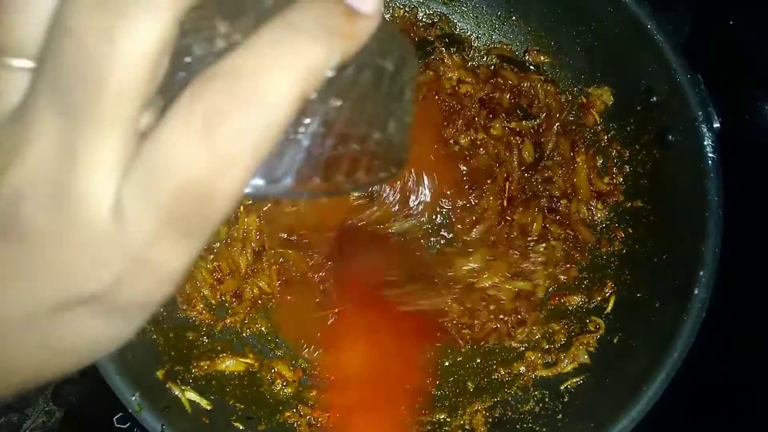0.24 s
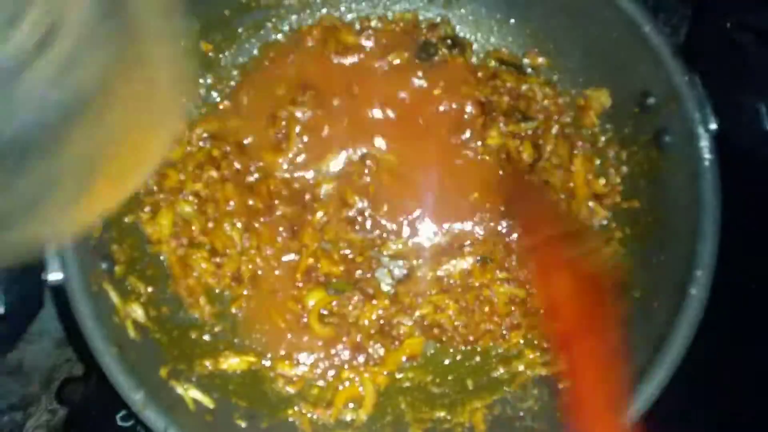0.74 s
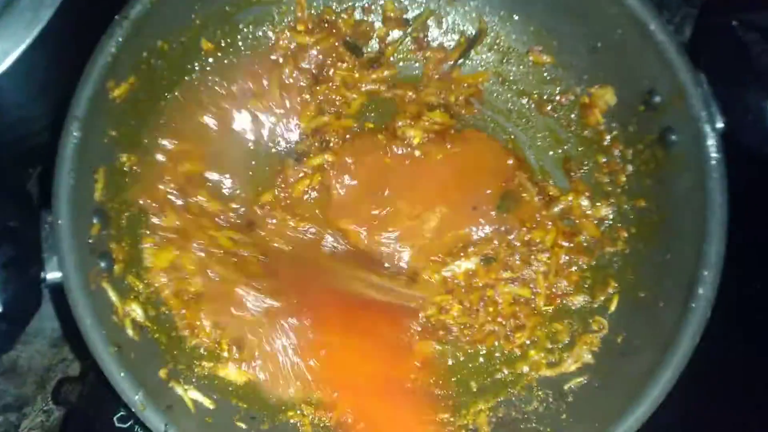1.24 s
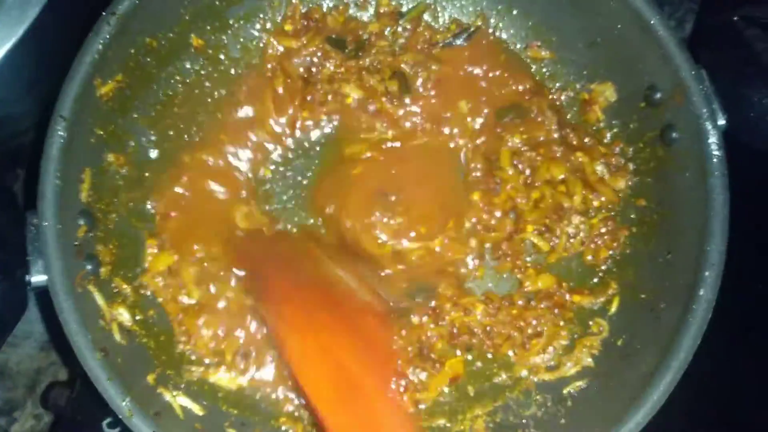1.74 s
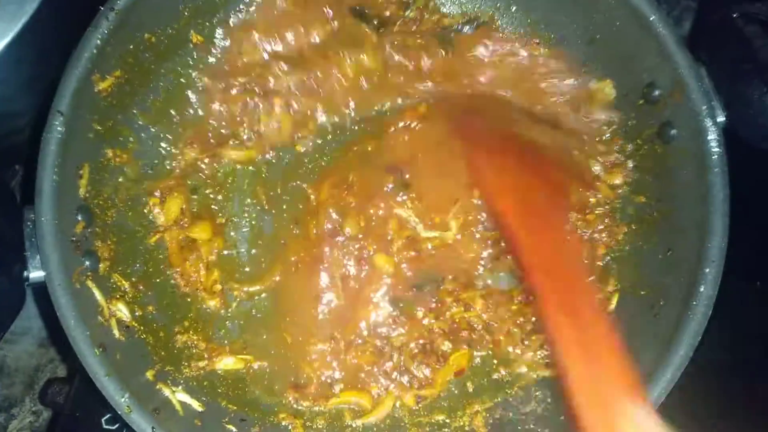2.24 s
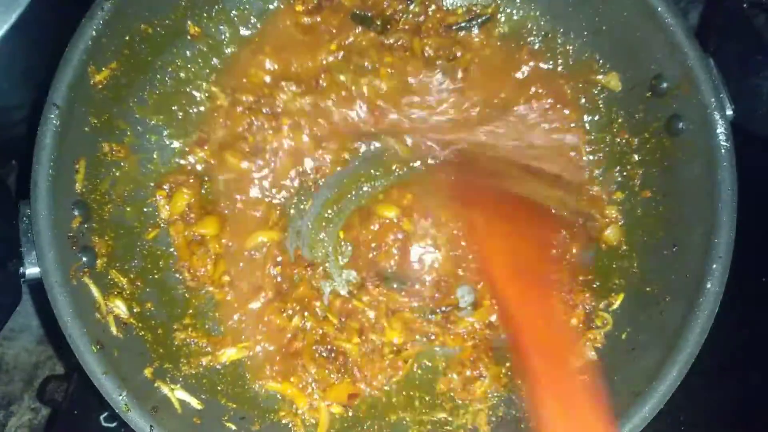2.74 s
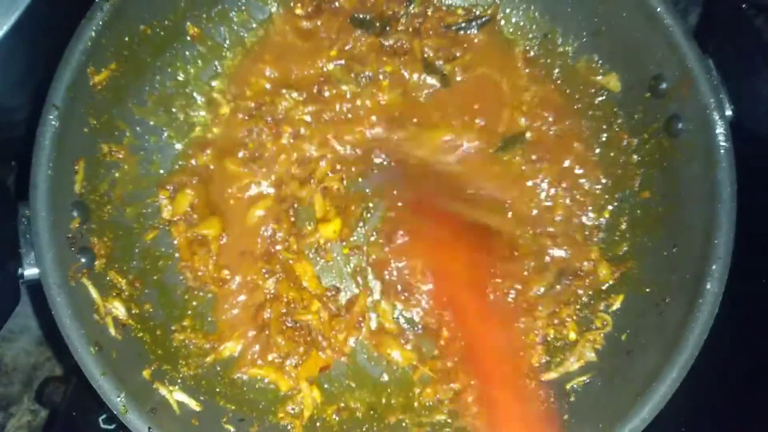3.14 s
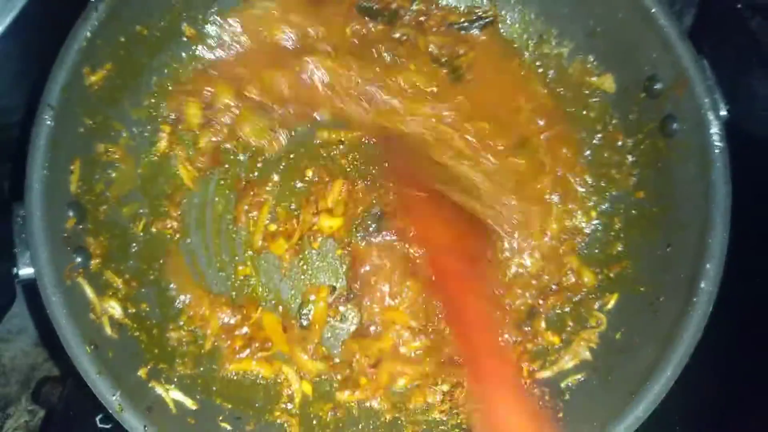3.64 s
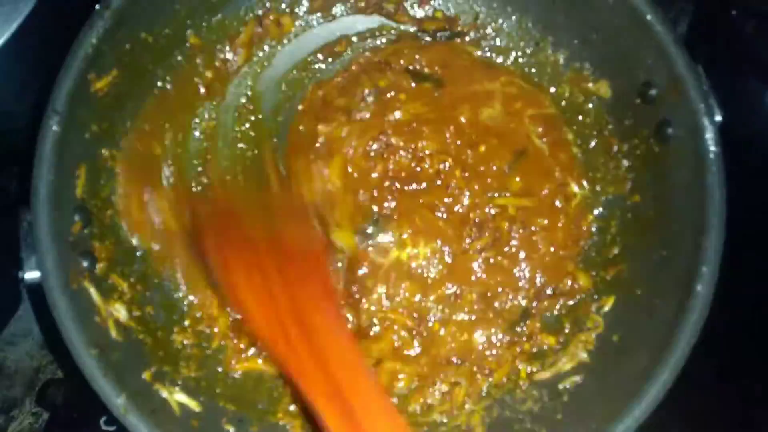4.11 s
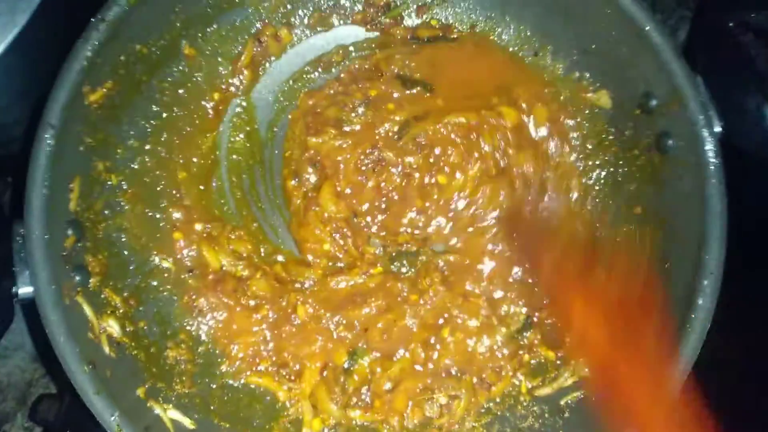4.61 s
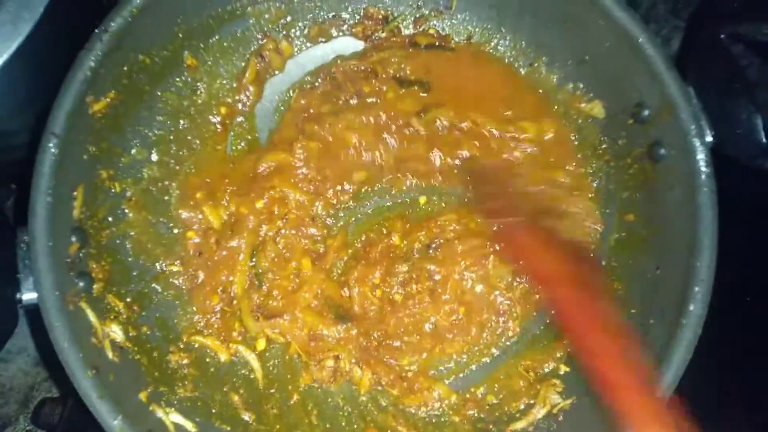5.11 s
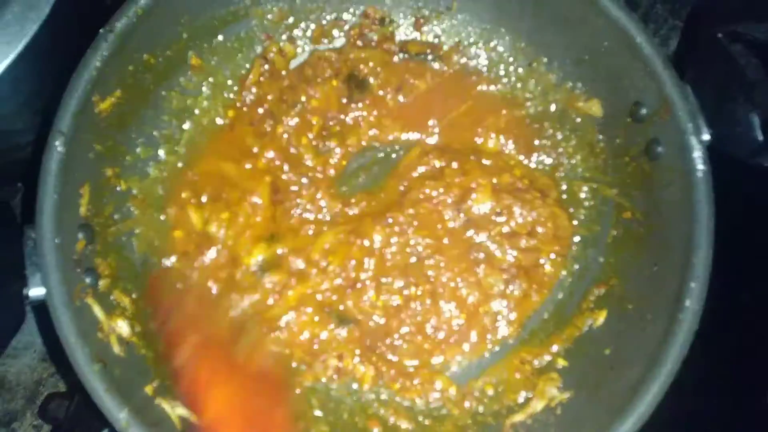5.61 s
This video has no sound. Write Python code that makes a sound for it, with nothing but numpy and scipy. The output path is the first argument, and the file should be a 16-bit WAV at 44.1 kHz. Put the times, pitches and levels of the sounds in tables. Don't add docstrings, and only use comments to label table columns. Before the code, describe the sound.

For nearly six seconds, wet onion masala sizzles in hot oil in a metal pan: bright steam hiss filled with fine crackles and bursting bubbles, fluttering constantly and somewhat stronger on the right. It surges around 0.3, 1.4 and 2.5 s, quietens to its lowest near 4 s, swells again at 4.8 s, then slowly eases. A wooden spatula gives a clear knock at 0.75 s with short pan ring, a gritty scrape cluster with light knocks at 2.5-2.7 s, more scraping at 3.4-3.6 s, and a dull knock at 3.8 s. Softer taps and scrapes follow at 4.5-4.7 s, the loudest, brighter blow at 5.2 s, and a dull knock with rubbing near 5.7 s. Beneath lie low gas-flame and traffic rumble, swelling slightly at 3.2 and 5.3 s, and a faint distant engine whine rising around 3.2-4.1 s. The small kitchen adds brief reflections; everything is close.

```python
import sys
import numpy as np
from scipy import signal
from scipy.fft import rfft, irfft, next_fast_len
from scipy.io import wavfile
from scipy.ndimage import uniform_filter1d, map_coordinates

SR = 44100
rng = np.random.default_rng(int(sys.argv[2]) if len(sys.argv) > 2 else 0)


def unload_audio(sound):
    columns = np.transpose(np.atleast_2d(sound))
    steps = np.round(np.clip(columns, -1, 1) * 32767)
    wavfile.write(sys.argv[1], SR, steps.astype(np.int16))


def voltage_ratio(level):
    return 10 ** (np.asarray(level, float) / 20)


N = 258406

# frequency in Hz, density in dB per Hz.
RUMBLE_SPECTRUM = [(12, -64), (20, -36), (38, -45), (59, -4.5), (81, -2.5), (108, 0.5), (220, -22.5),
                   (290, -44), (480, -120)]
# frequency in Hz, density in dB per Hz.
FLAME_SPECTRUM = [(94, -36), (160, -33.5), (300, -15), (350, -3), (428, -21.5), (615, -7), (771, -15),
                  (843, -2.5), (1100, -13), (1430, -27), (2420, -120)]
# middle in seconds, half length in seconds, swell in dB.
TRUCKS = [
    (3.205, 0.083, 6),
    (5.283, 0.11, 12),
]
# time in seconds, frequency in Hz.
ENGINE_PITCH = [(0, 337), (3.0, 335), (3.28, 369), (3.55, 376), (3.75, 392), (3.9, 428), (4.04, 452),
                (4.2, 446)]
# middle in seconds, half length in seconds, level in dB.
ENGINE_REVS = [(.05, .06, -59), (3.18, 0.12, -59), (3.626, 0.07, -66.5), (3.966, 0.047, -49.5),
               (4.077, 0.04, -56.5)]
# frequency in Hz, t60 in seconds.
KITCHEN_DECAY = [(150, 0.31), (500, 0.2), (1500, 0.19), (4000, 0.036)]
# frequency in Hz, left lead in radians.
PAN_LEAD = [(60, 2.5), (800, -1.5), (1000, 0.5), (1150, 4.5), (1500, 0.5), (1850, 0), (2500, -4)]
# frequency in Hz, left-right in dB.
PAN_SIDE = [(60, 2), (110, -11.5), (200, 4), (380, -2.5), (700, -4.5), (1290, 7), (2380, 1), (4400, 8),
            (8120, 4), (15000, -2.5)]
# frequency in Hz, width in Hz, level in dB.
PAN_BODY = [(257, 32, -4.5), (337.5, 57, -2), (490, 170, 0)]
# frequency in Hz, width in Hz, level in dB.
PAN_FLOOR = [(643, 130, 0), (846, 150, -1), (948, 170, -0.5), (1195, 290, 1.5)]
# frequency in Hz, width in Hz, level in dB.
BLADE = [(1604, 360, -3), (1782, 170, -3.5), (2250, 330, 2), (2830, 1000, 1)]
# start in seconds, length in seconds, peak in dB, pitch from in Hz, pitch to in Hz.
SCRAPES = [(0.388, 0.12, -37, 810, 960), (0.448, 0.092, -46.5, 1020, 1880), (1.329, 0.076, -42, 2210, 2250),
           (1.46, 0.22, -59, 940, 990), (2.523, 0.056, -53.5, 246, 340), (2.564, 0.056, -31.5, 900, 1030),
           (2.593, 0.055, -28, 1590, 1990), (2.599, 0.081, -48, 1100, 1270), (3.411, 0.13, -37, 870, 1000),
           (3.485, 0.092, -36.5, 1046, 826), (3.459, 0.13, -35.5, 1200, 1930),
           (3.49, 0.078, -29.5, 2310, 3300), (4.161, 0.034, -48, 970, 1010), (4.525, 0.045, -51, 258, 242),
           (4.558, 0.13, -37.5, 2160, 2250), (4.661, 0.084, -34, 1820, 1470), (4.912, 0.073, -41, 810, 960),
           (5.597, 0.055, -48, 356, 241), (5.675, 0.085, -42, 324, 414), (5.669, 0.15, -38, 774, 1100),
           (5.723, 0.091, -44.5, 566, 650), (5.736, .1, -43, 1210, 2100)]
# frequency in Hz, level in dB, t60 in seconds.
PAN_MODES = [(165.3, -16, 0.52), (246.4, -5, 0.27), (430, -7, 0.31), (511, -8.5, 0.51), (596, -15, 0.15),
             (930, -12, 0.12), (1028, -6, 0.19), (1210, 6, 0.24), (1370, -21, 0.31), (1517, -5, 0.11),
             (1690, -28, .15)]
# start in seconds, peak in dB, contact tone in Hz, low ring in dB, high ring in dB.
KNOCKS = [(0.425, -45, 900, -19, -8), (0.745, -16, 950, -15.5, -6.5), (1.073, -40, 1830, -21, -9),
          (2.526, -45, 226, -7.5, -12), (2.585, -34, 980, -29, -19), (2.602, -32, 1090, -33, -5),
          (3.791, -17.5, 937, -16, -22), (4.514, -27, 940, -10, -8), (4.675, -27, 1384, -19, -3),
          (5.183, -12, 1100, -16.5, -4), (5.608, -47, 326, -2.5, -19), (5.666, -24.5, 923, -16, -26)]
# frequency in Hz, density in dB per Hz.
STEAM_SPECTRUM = [(260, -41.5), (450, -8.5), (523, -29), (616, -17), (771, -17.5), (843, -12),
                  (1170, -19.5), (2260, -10.5), (2550, -14.5), (4230, -10.5), (6060, -9.5), (7930, 0.5),
                  (10800, -6.5), (15100, -12.5), (16000, -16)]
# frequency in Hz, left-right in dB.
PORT_COLOUR = [(60, 10), (99, 0.0), (160, -5), (270, 14.5), (450, -5.5), (740, -4), (1220, 0), (2010, 3),
               (3330, 0.5), (5500, -8.5), (9080, -4.5), (15000, 6.5)]
# centre in Hz, gain in dB.
CROWDS = [
    (2000, 57),
    (4000, 50.5),
    (7500, 41.5),
    (12000, 48.5),
]
# time in seconds, boil in dB, fine spit over it in dB, left-right in dB.
BOIL = [(0, -38.5, -16, -10.5), (.2, -41.5, -16.5, -9), (.31, -31, -12, -9.5), (.62, -35, -6, -11),
        (1.0, -37, -10, -11), (1.3, -43, -11.5, -9), (1.42, -33, -13, -10), (1.72, -33.5, -10.5, -10.5),
        (1.88, -38.5, -10.5, -7.5), (2.37, -40.5, -12, -9), (2.52, -35, -3.5, -3.5), (2.9, -44, -9, -7),
        (3.4, -39.5, -9.5, -6), (3.62, -44.5, -8.5, -9), (4.05, -51, -9.5, -6.5), (4.7, -44, -12, -7.5),
        (4.83, -34.5, -7.5, -4.5), (5.86, -45, -11, -6)]
# time in seconds, level in dB.
SIMMER = [(0, -57), (1.0, -54), (2.5, -56), (3.4, -59), (4.0, -63), (4.6, -59.5), (4.9, -60.5),
          (5.86, -60.5)]
# time in seconds, swell in dB, half length in seconds,
# centre in Hz.
FLARES = [(.35, 3.5, 0.051, 4000), (0.843, 4, 0.01, 5000), (0.96, 2, 0.042, 7800), (1.08, 3, 0.059, 3940),
          (1.15, 6.5, 0.025, 8000), (1.234, 5, 0.073, 7500), (1.348, -5, 0.027, 5100),
          (1.503, 2, 0.025, 12000), (1.84, -5.5, 0.09, 6050), (1.95, 5, .035, 6400),
          (1.97, 2.5, 0.021, 12100), (2.433, 5, 0.019, 7100), (2.6, 4, 0.063, 4700), (2.8, 3, 0.041, 10800),
          (2.976, 6, 0.015, 4450), (3.045, 0.5, 0.025, 8000), (3.14, 7.5, 0.012, 8060),
          (3.194, -6, 0.072, 6740), (3.252, 8.5, 0.022, 7800), (3.35, 4, 0.034, 12000),
          (3.545, 12, 0.02, 5100), (3.885, 7, 0.016, 12000), (4.03, 6, 0.04, 10800),
          (4.232, 5, 0.081, 7950), (4.363, 8, 0.054, 7400), (4.416, -10.5, 0.021, 7450),
          (4.436, 7.5, 0.027, 12000), (4.64, 2.5, 0.037, 10200), (5.334, -2, 0.23, 5640),
          (5.59, 3, 0.032, 12200)]


def unit(x):
    return x / np.sqrt(np.mean(x ** 2) + 1e-20)


def along(points, hz):
    f, v = np.transpose(points)
    return np.interp(np.log(hz + 1), np.log(f + 1), v)


def curves(rows):
    s, *columns = np.transpose(rows)
    return [np.interp(np.arange(N) / SR, s, column) for column in columns]


def wobble(rate_hz):
    knots = rng.standard_normal(int(N * rate_hz / SR) + 4)
    return map_coordinates(knots, [np.arange(N) * rate_hz / SR])


def swell(middle, half, t):
    return np.exp(-((t - middle) / half) ** 2)


def filtered(x, response):
    m = next_fast_len(N + SR // 2)
    return irfft(rfft(x, m) * response(np.fft.rfftfreq(m, 1 / SR)), m)[..., :N]


def resonance(centre_hz, width_hz, f):
    return 1j * f * width_hz / (centre_hz ** 2 - f * f + 1j * f * width_hz)


def hum():
    rumble, flame = [unit(filtered(rng.standard_normal((2, N)), lambda f: voltage_ratio(along(spectrum, f))))
                     for spectrum in (RUMBLE_SPECTRUM, FLAME_SPECTRUM)]
    t = np.arange(N) / SR
    passing_db = sum(db * swell(s, half_s, t) for s, half_s, db in TRUCKS)
    rumble_gain = voltage_ratio(-69 + passing_db + 2.1 * wobble(5))
    flame_gain = voltage_ratio(-65 + 1.6 * wobble(3.1))
    mid, side = rumble_gain * rumble + flame_gain * flame
    return np.array([mid + 0.14 * side, mid - 0.32 * side])


def engine():
    hz, = curves(ENGINE_PITCH)
    t = np.arange(N) / SR
    heard = sum(voltage_ratio(db) * swell(s, half_s, t) for s, half_s, db in ENGINE_REVS)
    phase = 2 * np.pi * np.cumsum(hz + 2.77 * wobble(38)) / SR
    return heard * voltage_ratio(2.6 * wobble(6.9)) * np.sin(phase)


def kitchen(x):
    hz, t, z = signal.stft(rng.standard_normal((2, SR // 2)), SR, nperseg=256)
    z[1] = np.where(hz[:, None] < 600, 1.2 * z[0] + 0.48 * z[1], z[1])
    decay = voltage_ratio(-60 * t / along(KITCHEN_DECAY, hz)[:, None])
    tail = signal.istft(z * decay, SR, nperseg=256)[1]
    delayed = np.pad(x, (250, 0))[None]
    return signal.fftconvolve(delayed, tail / np.linalg.norm(tail[0]), axes=1)[:, :N]


def ports(x):
    def response(f):
        half = voltage_ratio(along(PAN_SIDE, f) / 2)
        return np.array([half + 0j, np.exp(-1j * along(PAN_LEAD, f)) / half])
    return filtered(x, response)


def scrapes():
    reach_octaves, press_share, spill = 0.46, 0.51, 0.0089
    peaks = PAN_BODY + PAN_FLOOR + BLADE
    grit = unit(rng.standard_normal(N) * voltage_ratio(3 * wobble(400) + 1.0 * wobble(90)))

    def responses(f):
        return np.array([resonance(hz, width_hz, f) ** 2 / np.sqrt(width_hz / 28000)
                         for hz, width_hz, _ in peaks])
    rings = filtered(grit, responses)
    out = np.zeros(N + SR)
    for s, length_s, db, from_hz, to_hz in SCRAPES:
        start = round(s * SR)
        u = np.arange(min(round(length_s * SR), N - start)) / (length_s * SR)
        press = np.minimum(u / press_share, (1 - u) / (1 - press_share))
        pressure = np.sin(np.pi / 2 * press) ** 2
        spot_hz = from_hz * (to_hz / from_hz) ** u
        weights = np.array([voltage_ratio(level_db) * (spill + swell(0, reach_octaves, np.log2(hz / spot_hz)))
                            for hz, _, level_db in peaks])
        woken = np.sum(weights * rings[:, start:][:, :len(u)], axis=0) / np.linalg.norm(weights, axis=0)
        out[start:][:len(u)] += voltage_ratio(db - 2.5) * pressure * woken
    return out[:N]


def knocks():
    out, t = np.zeros(N + SR), np.arange(SR // 2) / SR
    turn = 2 * np.pi * t
    edge = np.sin(2050 * turn) + 0.33 * np.sin(2450 * turn)
    contact = (1 - np.exp(-t / 0.00084)) * np.exp(-(t / 0.0049) ** 3)
    for s, db, hz, low_db, high_db in KNOCKS:
        draw = rng.standard_normal((len(PAN_MODES), 2))
        blow = np.sin(hz * turn) + 0.5 * np.sin(1.347 * hz * turn + 2 * draw[0, 1])
        blow = blow + 0.44 * np.sin(0.684 * hz * turn)
        blow = (blow + voltage_ratio(-4.5 + 1.6 * high_db) * edge) * contact
        ring = 0
        for (mode_hz, level_db, t60_s), (luck_db, phase) in zip(PAN_MODES, draw):
            mode_db = level_db + luck_db + (low_db + 9.5 if mode_hz < 800 else high_db)
            ring = ring + voltage_ratio(mode_db - 60 * t / (0.69 * t60_s)) * np.sin(mode_hz * turn + 3 * phase)
        dull = signal.butter(4, [130, 1.5 * hz + 300], "bandpass", fs=SR, output="sos")
        rattle = unit(signal.sosfilt(dull, rng.standard_normal(len(t))))
        thud = voltage_ratio(low_db - 6 - 60 * t / 0.2) * rattle
        tail = (1 - np.exp(-t / 0.00067)) * (voltage_ratio(-12.5) * ring + thud)
        start = round(s * SR) + 110
        out[start:][:len(t)] += voltage_ratio(db - 0.5) * (blow + tail)
    return out[:N]


def bubbles(count, low_hz, high_hz, cycles, spread_db):
    draw, t = rng.random((count, 3)), np.arange(96) / SR
    hz = (low_hz + (high_hz - low_hz) * draw[:, 1])[:, None]
    size = voltage_ratio(-spread_db * np.log(1.002 - draw[:, 2]))[:, None] * np.sqrt(hz)
    envelope = np.exp(-hz * t / cycles) * (1 - np.exp(-hz * t))
    pops = size * np.sin(2 * np.pi * hz * t) * envelope
    at = (draw[:, :1] * N).astype(int) + np.arange(96)
    return unit(np.bincount(at.ravel(), pops.ravel())[:N])


def steam_and_bubbles():
    pops = bubbles(count=24000, low_hz=900, high_hz=16520, cycles=7, spread_db=2.0)
    return 0.8 * rng.standard_normal(N) + 0.5 * pops


def sizzle():
    boil_db, spit_db, pan_db = curves(BOIL)
    stir_db = boil_db - boil_db.mean()
    simmer_db = curves(SIMMER)[0] + 0.35 * stir_db
    sauce_db = -48 + 0.9 * stir_db
    levels_db = simmer_db, sauce_db, boil_db, boil_db + spit_db
    crowd = np.array([steam_and_bubbles() for _ in "lr"])
    hz, t, z = signal.stft(crowd * voltage_ratio(0.54 * wobble(25)), SR, nperseg=256)
    at = np.minimum((t * SR).astype(int), N - 1)
    swell_db = 0
    for k, (level_db, (_, gain_db)) in enumerate(zip(levels_db, CROWDS)):
        blend = along([(centre[0], k == j) for j, centre in enumerate(CROWDS)], hz)[:, None]
        swell_db = swell_db + blend * (level_db[at] + gain_db + 0.55 * wobble(20)[at])
    for s, db, half_s, centre_hz in FLARES:
        octaves = np.log2((hz[:, None] + 1) / centre_hz)
        swell_db = swell_db + db * swell(s, half_s, t) * swell(0, 0.82, octaves)
    patches = uniform_filter1d(rng.standard_normal(z.shape), size=3, axis=1)
    patches_db = 2.95 * unit(uniform_filter1d(patches, size=14, axis=2))
    shadow = np.clip(hz / 7000, 0, 1)[:, None]
    lr_db = along(PORT_COLOUR, hz)[:, None] + shadow * (pan_db[at] + 5.5)
    left_share = 1 / (1 + voltage_ratio(-2 * lr_db))
    colour = voltage_ratio(along(STEAM_SPECTRUM, hz)[:, None] + swell_db + patches_db)
    z = z * colour * np.sqrt([left_share, 1 - left_share])
    return voltage_ratio(-25) * signal.istft(z, SR, nperseg=256)[1][:, :N]


def scene():
    spatula = knocks() + scrapes()
    return hum() + engine() + voltage_ratio(-7.5) * kitchen(spatula) + ports(spatula) + sizzle()


def top_cut(x):
    return signal.sosfilt(signal.butter(12, 15830, fs=SR, output="sos"), x)


def record(dry):
    return top_cut(dry)


dry = scene()
out = record(dry)
unload_audio(out)
```